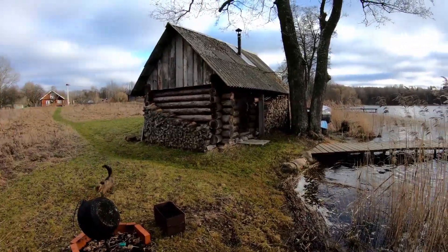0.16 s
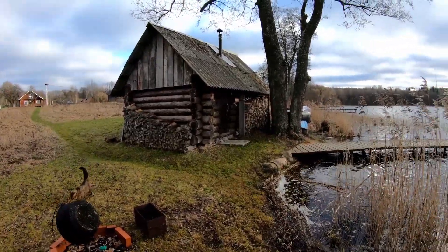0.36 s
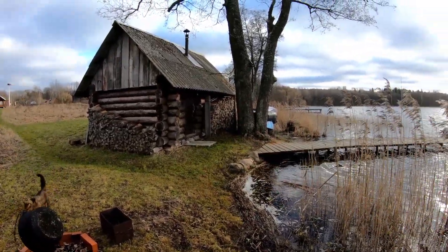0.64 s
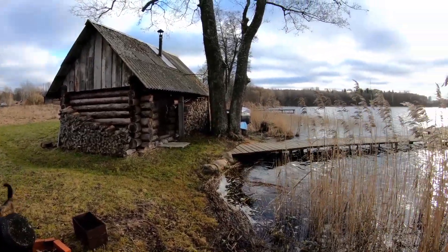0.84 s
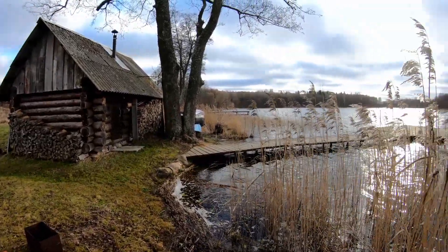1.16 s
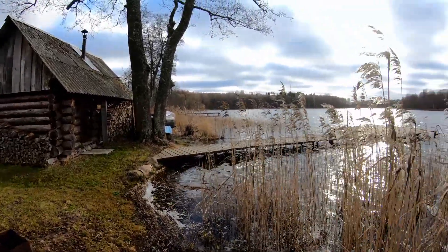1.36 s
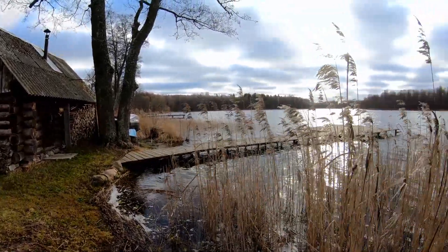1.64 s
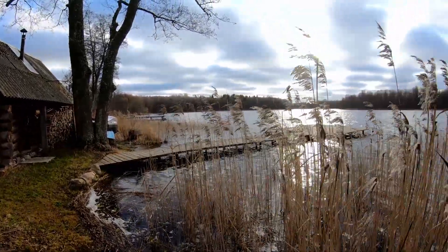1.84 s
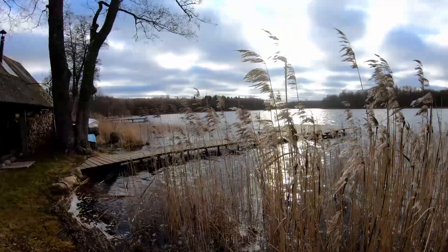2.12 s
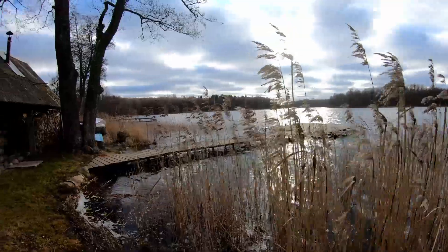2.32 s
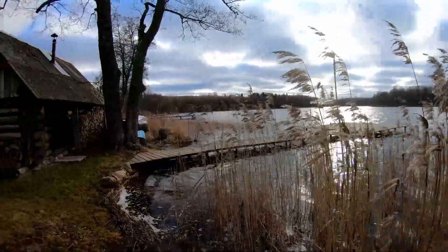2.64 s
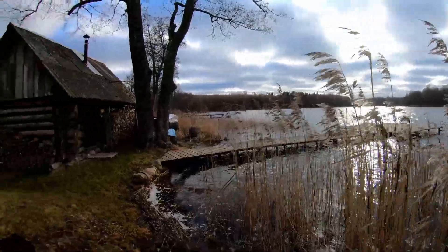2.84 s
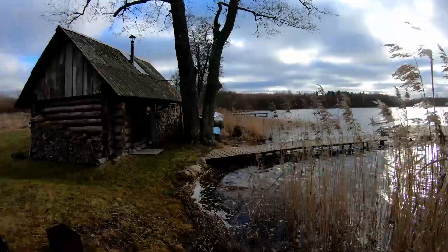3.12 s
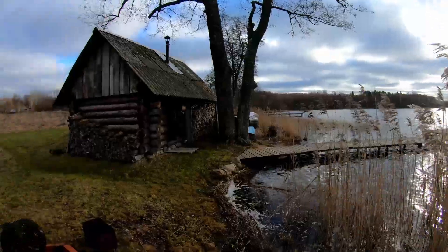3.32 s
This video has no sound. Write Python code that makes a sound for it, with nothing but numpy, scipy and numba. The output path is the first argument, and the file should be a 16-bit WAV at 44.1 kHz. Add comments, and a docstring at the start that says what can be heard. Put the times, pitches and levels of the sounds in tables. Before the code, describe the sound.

Gusty wind rumbles, flutters and thumps directly on a camera microphone at an open lake shore. Faint waves wash and dry reeds crackle throughout. From 0.3 to 2.6 seconds, short hollow plops come in irregular clusters, with tiny reed ticks from 0.5 and barely audible squeaks near 0.7. From 2.3 the buffeting strengthens, faint treble hiss peaks around 3.1, and a last plop comes at 3.45.

```python
"""Lake shore in gusty wind. From 0 s: turbulence rumbles, flutters and rasps on a camera microphone port (noise
bands), eddies thump (fast pressure flips), waves wash (noise and small bubbles), dry reeds hiss and crackle.
0.3 to 2.6 s: wavelets plop among the stems (paired damped sines, splash noise); from 0.5 s reeds tick (noise
bursts); 0.66 to 0.87 s: faint squeaks (gliding tones). From 2.3 s the wind is mostly stronger and the treble
hiss grows to a peak near 3.1 s; one last plop at 3.45 s."""
import sys
import numpy as np
from scipy import signal
from scipy.io import wavfile
from scipy.ndimage import uniform_filter1d, map_coordinates
from numba import njit

SR = 44100
rng = np.random.default_rng(int(sys.argv[2]) if len(sys.argv) > 2 else 0)


def store_pcm(level_fs):
    """Save levels as 16-bit WAV."""
    pcm = np.round(np.clip(level_fs, -1, 1) * 32767).astype(np.int16)
    wavfile.write(sys.argv[1], SR, np.atleast_2d(pcm).T)


N = 153468

# wind on the port: start_s, rumble_db, flutter_re_rumble_db, rasp_re_rumble_db (before range trims)
GUST_LEVELS = [(0.0, -39, 3.5, -16), (0.09, -31, -3, -14), (0.13, -39, 5.5, -10), (0.39, -31, -14.5, -29.5),
               (0.5, -38.5, 0, -18), (0.61, -24, -14.5, -29.5), (0.85, -45, -8, -7), (0.93, -36.5, -4, -22),
               (0.97, -43.5, 6, 0), (0.99, -27.5, -6, -38), (1.04, -41, 5.5, -29), (1.07, -31, -13.5, -37),
               (1.33, -31.5, -9, -22), (1.51, -34.5, -15.5, -27), (1.66, -38, -8, -8),
               (1.72, -37.5, -4, -14.5), (1.84, -38, -3.5, -13.5), (2.29, -30.5, -6, -19),
               (2.3, -33.5, -11, -11), (2.39, -40, 3, -17.5), (2.48, -26.5, -8.5, -14.5),
               (2.51, -28, 0.5, -8.5), (2.62, -29, -5, -16), (2.73, -37, -5, -16.5),
               (2.8, -23.5, -8, -24.5), (2.93, -33.5, 1, -15), (3.02, -23.5, -5.5, -17),
               (3.29, -31, -5, -19), (3.32, -16.5, -12.5, -25), (3.38, -33, 2.5, -9.5),
               (3.47, -28.5, -4, -15.5)]
# wind spectrum: freq_hz, density_db_per_hz
WIND_SPECTRUM = [(18, -6.5), (49, 2), (91, -2), (161, -2), (491, -28.5), (542, -26.5), (670, -37.5),
                 (900, -39), (1300, -49.5)]
# strong single eddies: flip_s, level_db, swing_s, edge_s, direction (+1 or -1)
STRONG_EDDIES = [(0.04, -18.5, 0.0054, 0.00052, 1), (0.173, -21.5, 0.0013, 0.0012, 1),
                 (0.55, -24, 0.002, 0.0018, 1), (0.972, -30, 0.0012, 0.0013, 1),
                 (1.704, -22, 0.0026, 0.0019, 1), (2.001, -27, 0.0024, 0.0032, 1),
                 (2.309, -11.5, 0.0027, 0.00081, 1), (2.444, -21, 0.0043, 0.0026, 1),
                 (2.532, -23, 0.0023, 0.0014, 1), (2.552, -30, 0.0012, 0.001, 1),
                 (2.79, -15.5, 0.001, 0.0012, -1), (2.853, -22.5, 0.0039, 0.00055, 1),
                 (2.982, -17, 0.0025, 0.003, 1), (2.906, -26.5, 0.0021, 0.00051, 1),
                 (3.046, -24.5, 0.0053, 0.00036, 1), (3.059, -21.5, 0.0041, 0.00041, -1),
                 (3.329, -21.5, 0.0032, 0.00028, 1), (3.393, -16.5, 0.0013, 0.00058, -1)]
# shore levels: start_s, wash_db, wash_tilt_db_per_octave, treble_hiss_db
SHORE_LEVELS = [(0.0, -51.5, 6.5, -84.5), (0.68, -50.5, 4.5, -78), (0.86, -50, 2, -82.5),
                (1.01, -55, 5, -78.5), (1.1, -56, 2.5, -82), (1.63, -51, 0, -78), (1.95, -54.5, -1, -75.5),
                (3.08, -59.5, 6, -74), (3.14, -57.5, 5, -68), (3.19, -59.5, 7.5, -72),
                (3.215, -56.5, 4, -77), (3.47, -55, -1, -79)]
# wash spectrum, also of bubbles and crackle: freq_hz, density_db_per_hz
WASH_SPECTRUM = [(500, 2), (1290, -1), (1650, 3), (1950, -10), (2150, -3), (2580, -6.5), (3070, -5.5),
                 (4420, -14), (6500, -57.5)]
# reed hiss spectrum: freq_hz, density_db_per_hz
HISS_SPECTRUM = [(5500, 0.5), (6100, 4), (7660, 8), (8950, 0), (10000, 0), (11600, -34.5)]
# plops: start_s, level_db, bubble_hz, bubble2_hz, bubble2_re_first_db, ring_t60_s, splash_re_plop_db
PLOP_EVENTS = [(0.32, -39.5, 768, 1970, 4.5, 0.064, -19), (0.347, -33, 1617, 2250, 10, 0.025, -5.5),
               (0.368, -20.5, 1180, 1930, -10, 0.022, -19), (0.42, -25.5, 1280, 2010, 2.5, 0.042, -9.5),
               (0.451, -35.5, 1700, 1870, -1, 0.052, -20), (0.497, -41, 1750, 2930, 0, 0.075, 3),
               (0.519, -30, 1780, 3170, 4.5, 0.018, -6), (0.62, -29.5, 1075, 1870, -0.5, 0.029, -34),
               (0.744, -27.5, 1285, 1980, -2, 0.027, -12), (0.774, -36.5, 1370, 1890, -10, 0.03, -2.5),
               (0.783, -36.5, 647, 1370, -8, 0.045, -24), (0.844, -48.5, 1860, 3250, 17, 0.031, -1),
               (0.959, -37, 1740, 2286, 11.5, 0.055, 1), (0.974, -42, 1950, 2334, 7, 0.081, -2),
               (1.012, -47, 1090, 2370, 6, 0.042, 0), (1.12, -36, 1630, 2080, -3, 0.031, -9.5),
               (1.147, -35, 1540, 2870, -7, 0.021, -11.5), (1.2, -33.5, 1655, 1010, 0.5, 0.024, -14),
               (1.279, -31.5, 1400, 2180, -9, 0.025, -37), (1.311, -24.5, 1650, 2160, -0.5, 0.03, -28),
               (1.379, -32.5, 934, 1430, 6, 0.029, -23), (1.411, -37, 760, 1250, 6, 0.036, -13),
               (1.469, -33.5, 800, 2145, -2, 0.026, -12), (1.656, -35.5, 1540, 2120, 1, 0.039, -16),
               (1.664, -31.5, 578, 4000, -18, 0.036, -16), (1.685, -36, 2050, 4900, -5, 0.028, -22),
               (1.786, -46, 630, 3020, 10.5, 0.043, -1), (1.844, -33.5, 1520, 2180, -12, 0.021, -12.5),
               (1.905, -23.5, 1260, 2030, -11.5, 0.03, -18), (2.035, -32.5, 817, 2280, -26, 0.044, -39),
               (2.151, -30, 622, 1840, -11, 0.029, -14), (2.394, -31, 953, 1620, 1.5, 0.032, -18),
               (2.607, -40.5, 2950, 3700, 4, 0.02, -8.5), (2.609, -33, 658, 1025, -4, 0.051, -20),
               (2.62, -36.5, 1510, 960, 6, 0.04, -24), (3.449, -30.5, 914, 1290, -2, 0.042, -18)]
# reed ticks: start_s, level_db (before trim)
REED_TICKS = [(0.4978, -54), (0.5075, -60), (0.5125, -59), (0.5195, -56), (0.7766, -72), (0.9552, -64),
              (1.2376, -65), (1.468, -59), (1.583, -54), (1.6841, -60), (1.8407, -60), (2.157, -58),
              (2.373, -50), (2.609, -58)]
# squeaks: start_s, length_s, start_hz, middle_hz, end_hz, level_db, harmonic2_db, harmonic3_db
SQUEAK_EVENTS = [(.656, .03, 1750, 1850, 2150, -53, -90, -90), (.692, .03, 1140, 1275, 1160, -75, -52, -52),
                 (.722, .112, 2050, 1995, 1900, -58, -57, -90),
                 (.832, .034, 2600, 2500, 2200, -53, -90, -90)]

RASP_EXPONENT = 0.62
EDDIES_PER_S, EDDY_RE_FLUTTER_DB, EDDY_SCATTER_DB = 70, 2.5, 2
EDDY_BASE_SWING_S, EDDY_BASE_EDGE_S = 0.0031, 0.0014
WASH_SWELL_DB, WASH_TRIM_DB = 1.1, -1.5
BUBBLES_PER_S, BUBBLE_TRIM_DB, BUBBLE_SCATTER_DB, BUBBLE_T60_CYCLES = 500, -4, 5.5, 2.86 * 11.4
CRACKLES_PER_S, CRACKLE_TRIM_DB, CRACKLE_SCATTER_DB, CRACKLE_T60_CYCLES = 900, -8, 2.5, 2.86 * 3.2
CLUSTER_DB, CLUSTERS_PER_S = 5.5, 40
PLOP_GLIDE_FRACTION, PLOP_RISE_S, PLOP_TRIM_DB, PLOP_ROUGH_DB = 0.053, 0.0037, 1.5, 2.8
SPLASH_T60_S, SPLASH_RISE_S = 0.035, 0.0016
TOP_HZ = 11750


def undb(db):
    """Decibels to amplitude."""
    return 10 ** (np.asarray(db) / 20)


def unit(x):
    """Scale to an RMS of 1."""
    return x / np.sqrt(np.mean(x ** 2))


def curve(table, col):
    """One column of a time table, sample by sample."""
    table = np.array(table)
    return np.interp(np.arange(N) / SR, table[:, 0], table[:, col])


def colour_db(table, hz):
    """Spectrum level, interpolated on log frequency."""
    table = np.array(table)
    return np.interp(np.log(hz), np.log(table[:, 0]), table[:, 1])


def band(x, lo_hz, hi_hz):
    """Second-order Butterworth band-pass."""
    return signal.sosfilt(signal.butter(2, [lo_hz, hi_hz], "band", fs=SR, output="sos"), x)


def walk(rate_per_s):
    """Random levels joined smoothly; spread near 1."""
    hop = 32
    knots = np.arange(0, N, hop) / SR * rate_per_s
    steps = map_coordinates(rng.standard_normal(1500), [knots], order=3).repeat(hop)[:N]
    return 1.2 * uniform_filter1d(steps, size=hop)


def noise_bands(table, lo_hz, hi_hz, shared_db, own_db, rate_per_s, count, tilt_db=0):
    """Adjoining noise bands that swell together and flicker alone."""
    out, edges = 0, np.geomspace(lo_hz, hi_hz, count + 1)
    for lo, hi in zip(edges, edges[1:]):
        hz = np.sqrt(lo * hi)
        level_db = colour_db(table, hz) + shared_db + own_db * walk(rate_per_s)
        level_db = level_db + tilt_db * np.log2(hz / 1500)
        out = out + undb(level_db) * band(rng.standard_normal(N), lo, hi)
    return unit(out)


@njit
def grains(n, sr, start, hz, t60, rise, glide, size):
    """Damped sines that rise quickly and glide in pitch while they die."""
    out = np.zeros(n)
    for k in range(len(start)):
        i0, m, phase = int(start[k] * sr), int(t60[k] * sr), 0.
        fall, up = np.exp(-np.log(1000.) / m), np.exp(-1 / (rise[k] * sr + 1))
        decay, unrisen = size[k], 1.
        for i in range(min(m, n - i0)):
            phase += 2 * np.pi * hz[k] * (1 + glide[k] * i / m) / sr
            decay *= fall
            unrisen *= up
            out[i0 + i] += decay * (1 - unrisen) * np.sin(phase)
    return out


def swarm(per_s, table, lo_hz, hi_hz, t60_cycles, scatter_db, glide):
    """Random grains whose pitches fill a band and whose sizes follow a spectrum."""
    when, pitch, chance = rng.random((3, int(per_s * N / SR)))
    hz = lo_hz * (hi_hz / lo_hz) ** pitch
    size_db = colour_db(table, hz) + 20 * np.log10(hz) - scatter_db * np.log(chance + .04)
    return unit(grains(N, 1. * SR, when * N / SR, hz, t60_cycles / hz, 0.4 / hz, glide + 0 * hz, undb(size_db)))


def bursts(start_s, level_db, rise_s, t60_s, lo_hz, hi_hz):
    """Band noise under gates that rise quickly and decay exponentially."""
    gate = np.zeros(N)
    gate[(start_s * SR).astype(int)] = undb(level_db)
    gate = signal.lfilter([1], [1, -np.exp(-np.log(1000) / (t60_s * SR))], gate)
    k = np.exp(-1 / (rise_s * SR))
    gate = signal.lfilter([1 - k], [1, -k], gate)
    noise = band(band(rng.standard_normal(N), lo_hz, hi_hz), lo_hz, hi_hz)
    return gate * unit(noise)


def turbulence():
    """Wind pressure noise in three ranges: rumble, flutter and rasp."""
    shared, low_db = 1.09 * walk(23.55), curve(GUST_LEVELS, 1)
    rumble = noise_bands(WIND_SPECTRUM, 24.5, 120.9, 0.14 * shared, 2.96, 7.35, count=4)
    flutter = noise_bands(WIND_SPECTRUM, 118.6, 292.6, shared, 1.5, 21.24, count=4)
    rasp = noise_bands(WIND_SPECTRUM, 306.0, 1325, 0.28 * shared, 2.9, 25.09, count=6)
    # the rasp rides on the flutter
    swell = uniform_filter1d(np.abs(flutter), size=300) ** RASP_EXPONENT
    rasp = unit(swell * rasp)
    out = undb(low_db - 2.0) * rumble
    out = out + undb(low_db + curve(GUST_LEVELS, 2) - 1.5) * flutter
    return out + undb(low_db + curve(GUST_LEVELS, 3) - 3.0) * rasp


def flips(flip_s, size, swing_s, edge_s):
    """Pressure builds, flips over quickly as the eddy passes the port, and relaxes."""
    out, t = np.zeros(N + 4000), np.arange(-1000, 1000) / SR
    for s, a, swing, edge in zip(flip_s, size, swing_s, edge_s):
        i = int(s * SR)
        out[i:i + len(t)] -= a * np.tanh(t / edge) * np.exp(-np.abs(t) / swing + edge / swing)
    return out[len(t) // 2:][:N]


def eddies():
    """Random small eddies follow the flutter level; strong single ones thump."""
    when, chance, side, swing_u, edge_u = rng.random((5, int(EDDIES_PER_S * N / SR)))
    size = undb(-EDDY_SCATTER_DB * np.log(chance + 0.0077)) * np.sign(side - .5)
    small = flips(when * N / SR, size, EDDY_BASE_SWING_S * (0.7 + swing_u), EDDY_BASE_EDGE_S * (0.61 + edge_u))
    flutter_db = curve(GUST_LEVELS, 1) + curve(GUST_LEVELS, 2)
    flip_s, level_db, swing_s, edge_s, direction = np.array(STRONG_EDDIES).T
    strong = flips(flip_s, np.sign(direction) * undb(level_db), swing_s, edge_s)
    return undb(flutter_db + EDDY_RE_FLUTTER_DB) * unit(small) + strong


def wash():
    """Small waves: swelling noise plus a fizz of small bubbles rising in pitch."""
    noise = noise_bands(WASH_SPECTRUM, 548, 6850, WASH_SWELL_DB * walk(12), 2.12, 16, count=10,
                        tilt_db=curve(SHORE_LEVELS, 2))
    fizz = swarm(BUBBLES_PER_S, WASH_SPECTRUM, 526.4, 5780, BUBBLE_T60_CYCLES, BUBBLE_SCATTER_DB, 0.21)
    return undb(curve(SHORE_LEVELS, 1)) * (undb(WASH_TRIM_DB) * noise + undb(BUBBLE_TRIM_DB) * fizz)


def reed_hiss():
    """Dry stems hiss: flickering treble noise."""
    hiss = noise_bands(HISS_SPECTRUM, 5900, 12500, 0.86 * walk(10.72), 1.8, 22.03, count=5)
    return undb(curve(SHORE_LEVELS, 3)) * hiss


def reed_crackle():
    """Dry stems crackle: very short damped sines in dense clusters."""
    crackle = swarm(CRACKLES_PER_S, WASH_SPECTRUM, 930, 5500, CRACKLE_T60_CYCLES, CRACKLE_SCATTER_DB, 0)
    crackle = crackle * undb(CLUSTER_DB * walk(CLUSTERS_PER_S))
    return undb(curve(SHORE_LEVELS, 1) + CRACKLE_TRIM_DB) * unit(crackle)


def plops():
    """Each plop rings two bubbles, the second dying sooner, and splashes."""
    start_s, level_db, hz, hz2, second_db, t60_s, splash_db = np.array(PLOP_EVENTS).T
    one = np.ones(len(start_s))
    rise, glide, ring_db = PLOP_RISE_S * one, PLOP_GLIDE_FRACTION * one, level_db + PLOP_TRIM_DB
    rings = grains(N, 1. * SR, start_s, hz, t60_s, rise, glide, undb(ring_db))
    rings = rings + grains(N, 1. * SR, start_s, hz2, 0.59 * t60_s, rise, glide, undb(ring_db + second_db))
    splash = bursts(start_s, level_db + splash_db, SPLASH_RISE_S, SPLASH_T60_S, 840, 4030)
    return undb(PLOP_ROUGH_DB * walk(400)) * rings + splash


def reed_ticks():
    """Dry stems tick: very short treble noise bursts."""
    start_s, level_db = np.array(REED_TICKS).T
    return bursts(start_s, level_db - 3.0, rise_s=0.0004, t60_s=0.01, lo_hz=2700, hi_hz=11000)


def squeaks():
    """Thin gliding tones of three harmonics with soft ends and a slight waver in level."""
    out = np.zeros(N)
    for start_s, length_s, hz0, hz1, hz2, *levels_db in SQUEAK_EVENTS:
        u = np.arange(int(length_s * SR)) / (length_s * SR)
        # parabola through start, middle and end pitch
        hz = hz0 * (1 - u) * (1 - 2 * u) + 4 * hz1 * u * (1 - u) + hz2 * u * (2 * u - 1)
        phase = 2 * np.pi * np.cumsum(hz) / SR
        tone = sum(undb(db) * np.sin((k + 1) * phase) for k, db in enumerate(levels_db))
        i = int(start_s * SR)
        out[i:i + len(u)] += np.sqrt(2) * tone * np.sqrt(np.sin(np.pi * u))
    return out * undb(1.8 * walk(110))


def scene():
    """Sum of wind, shore, reeds and squeaks, one channel."""
    wind = turbulence() + eddies()
    water = wash() + plops()
    reeds = reed_hiss() + reed_crackle() + reed_ticks()
    return (wind + water + reeds + squeaks())[None]


def record(dry):
    """The camera cuts the top: steep elliptic low-pass."""
    return signal.sosfilt(signal.ellip(8, .2, 40, TOP_HZ, fs=SR, output="sos"), dry)


dry = scene()
out = record(dry)
store_pcm(out)
```